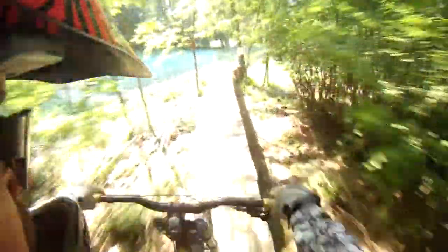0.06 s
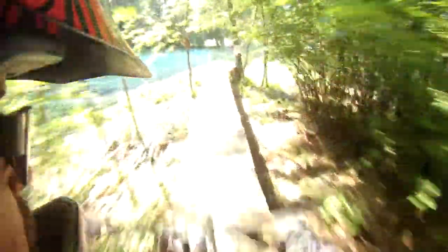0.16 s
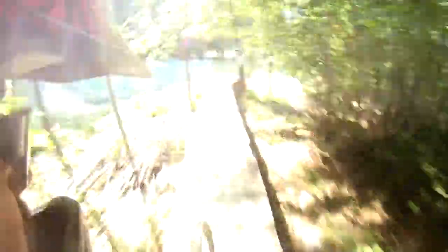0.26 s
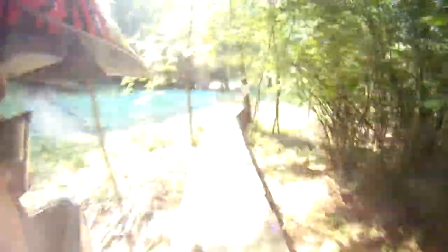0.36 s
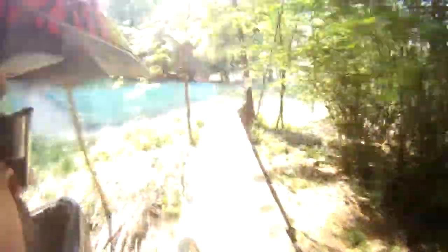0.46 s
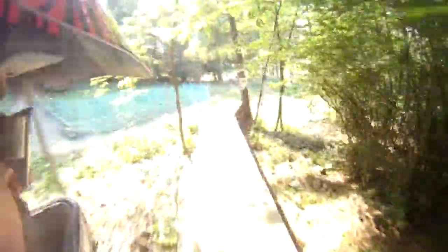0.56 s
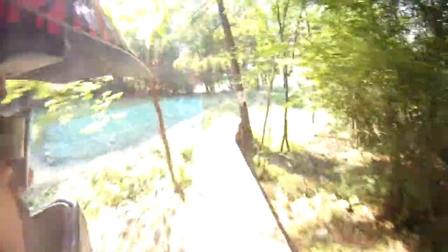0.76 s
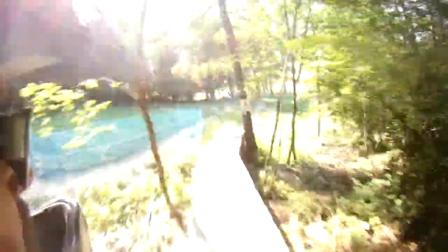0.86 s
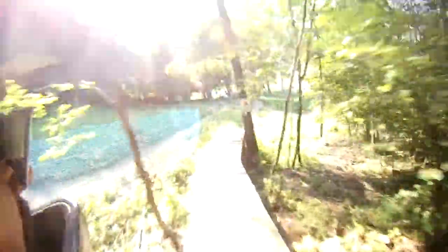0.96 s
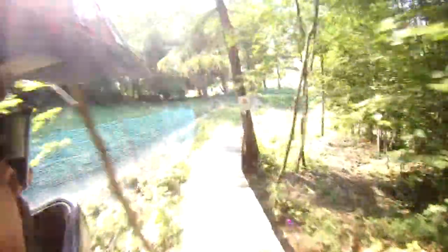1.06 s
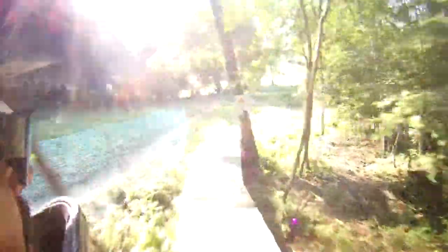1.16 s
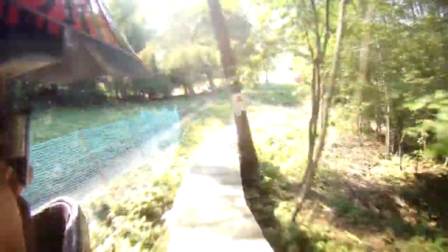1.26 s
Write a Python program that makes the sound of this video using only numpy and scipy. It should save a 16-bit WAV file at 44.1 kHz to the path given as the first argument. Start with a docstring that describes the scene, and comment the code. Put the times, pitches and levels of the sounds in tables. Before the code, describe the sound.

A bike lands on an outdoor walkway with a deep thump and a sharp metallic rattle, heard from the rider's helmet. A brief squeaky tyre scuff follows, then quieter rolling, light chain jingles and low wind rumble.

```python
"""Mountain bike drop onto a walkway

A narrow walkway, heard at riding height from the microphone of a camera on the rider's helmet.
Both wheels thump down, chain and frame clatter, a tyre scuffs, then the bike rolls on with a few knocks.
Wind rumbles on the microphone; the camera case rings near 2 and 5 kHz, colouring clatter and tread."""
import sys
import numpy as np
from scipy import signal
from scipy.fft import rfft, irfft
from scipy.io import wavfile

SR = 44100
rng = np.random.default_rng(int(sys.argv[2]) if len(sys.argv) > 2 else 0)


def dump_mix(stems):
    """Bounce the given channels to the path in sys.argv[1] as a 16-bit WAV at rate SR."""
    frames = np.atleast_2d(stems).T  # one column per channel
    limited = np.clip(frames, -1, 1)  # hard clip at full scale
    pcm = np.round(limited * 32767).astype(np.int16)
    wavfile.write(sys.argv[1], SR, pcm)


N = 57330
TIME = np.arange(N) / SR
FREQS = np.maximum(np.arange(N // 2 + 1) * SR / N, 1)


def from_db(db):
    """Decibels to gain."""
    return 10 ** (np.asarray(db) / 20)


def rms_one(x):
    """Scale to unit rms."""
    return x / np.sqrt(np.mean(x ** 2) + 1e-20)


def level(curve):
    """Gain along a (time [s], level [dB]) curve, holding its end values outside it."""
    times, db = np.transpose(curve)
    return from_db(np.interp(TIME, times, db))


def swell(peak_s, half_s):
    """A bell-shaped rise and fall."""
    return np.exp(-((TIME - peak_s) / half_s) ** 2)


def dying(start_s, t60_s, attack_s):
    """A quick rise, then exponential decay."""
    age = np.maximum(TIME - start_s, 0)
    return (1 - np.exp(-age / attack_s)) * from_db(-60 * age / t60_s)


def colour_db(colour):
    """A (frequency [Hz], gain [dB]) curve at every frequency, falling away below its first point."""
    hz, db = np.transpose(colour)
    low_cut_db = 40 * np.log10(np.clip(FREQS / hz[0], .03, 1))
    return np.interp(np.log(FREQS), np.log(hz), db) + low_cut_db


def shaped(x, db):
    """Minimum-phase filter with the given response, so that nothing sounds early."""
    cepstrum = irfft(np.log(from_db(db)), N)
    cepstrum[1:N // 2] *= 2
    cepstrum[N // 2 + 1:] = 0
    return irfft(rfft(x) * np.exp(rfft(cepstrum)), N)


def noise(colour):
    """Unit-rms noise with the given spectrum."""
    return rms_one(shaped(rng.standard_normal(N), colour_db(colour)))


def drift(rate_hz):
    """Unit-rms random wander, mostly slower than rate_hz."""
    hz = np.arange(N // 2 + 1) * SR / N
    return rms_one(irfft(rfft(rng.standard_normal(N)) / (1 + (hz / rate_hz) ** 2), N))


def ring(clicks, hz, t60_s):
    """A resonator: each click starts a decaying sine."""
    radius, angle = from_db(-60 / (t60_s * SR)), 2 * np.pi * hz / SR
    return signal.lfilter([0, np.sin(angle)], [1, -2 * radius * np.cos(angle), radius ** 2], clicks + 1e-18)


def wind():
    """Air rumbles right on the microphone, surging as the drop shakes it."""
    # rumble spectrum: (frequency [Hz], relative gain [dB])
    colour = [(15, -10), (35, 4.5), (60, 2.5), (100, -7.5), (200, -10), (320, -19), (500, -24.5),
              (900, -34.5), (2000, -61)]
    # wind strength: (time [s], level [dB])
    strength = [(0, -43.5), (0.2, -44), (0.45, -42), (0.58, -43), (0.72, -42), (0.8, -43), (0.93, -43),
                (1.05, -41.5), (1.18, -45), (1.3, -42.5)]
    jolt = from_db(-29) * swell(peak_s=0.2815, half_s=0.056)
    return noise(colour) * from_db(0.5 * drift(rate_hz=16)) * (level(strength) + jolt)


def rolling():
    """Grainy rush of the tread on the walkway below, with light jingles of the chain."""
    # tread spectrum: (frequency [Hz], relative gain [dB])
    tread_colour = [(300, -3.5), (600, -8.5), (800, -10.5), (980, -5.5), (1250, -11), (1700, -2), (2200, 2),
                    (2800, -10.5), (4200, -17.5), (5100, -7.5), (5800, -19.5), (6800, -27.5), (10000, -35),
                    (15000, -49)]
    # tread rush: (time [s], level [dB])
    rush = [(0, -58), (0.1, -53), (0.18, -57), (0.4, -49), (0.55, -52), (0.73, -54), (0.88, -50),
            (0.965, -53), (1.1, -53.5), (1.25, -54), (1.3, -53)]
    # chain spectrum: (frequency [Hz], relative gain [dB])
    chain_colour = [(1300, -20), (1800, -6), (2200, 2), (2600, -14), (3500, -16.5), (9000, -42)]
    # chain jingles: (time [s], level relative to jingle_db [dB])
    jingles = [(0.925, 0.5), (0.999, -0.5), (1.141, -3.5), (1.206, -2)]
    jingle_db, grain_db = -46, 1.55
    tread = noise(tread_colour) * level(rush)
    chain = noise(chain_colour) * sum(from_db(jingle_db + db) * swell(s, half_s=0.015) for s, db in jingles)
    return (tread + chain) * from_db(grain_db * drift(rate_hz=90))


def scuff():
    """A tyre rubs sideways on the walkway, squeaks unsteadily and throws a little grit."""
    # rubbing spectrum: (frequency [Hz], relative gain [dB])
    rub_colour = [(500, -32), (1150, -14), (1600, 1), (2300, 3.5), (3000, -4), (3900, -3.5), (4800, -5),
                  (6200, -8.5), (7200, -21), (9300, -27), (10500, -31), (15000, -40)]
    # rubbing strength: (time [s], level [dB])
    rub = [(0.36, -62), (0.398, -42.5), (0.425, -45), (0.465, -41.5), (0.49, -51.5), (0.52, -49.5),
           (0.57, -83)]
    # rubber squeaks: (peak time [s], half length [s], pitch [Hz], level [dB])
    squeaks = [(0.47, 0.015, 1785, -34), (0.455, 0.027, 2230, -39), (0.462, 0.04, 1640, -41),
               (0.48, 0.025, 4600, -47)]
    # spectrum of thrown grit: (frequency [Hz], relative gain [dB])
    swish_colour = [(2500, -19), (4500, 1.5), (6500, 3), (8500, -13), (15000, -32)]
    # swishes of grit: (peak time [s], half length [s], level [dB])
    swishes = [(0.401, 0.004, -55), (0.556, 0.0094, -53), (0.643, 0.0061, -58)]
    sag_per_s, waver_hz, flutter_db = 0.4, 14, 2.3
    out = noise(rub_colour) * level(rub)
    for s, half_s, hz, db in squeaks:
        pitch_hz = hz * (1 - sag_per_s * (TIME - s)) + waver_hz * drift(rate_hz=153)
        envelope = from_db(db + flutter_db * drift(rate_hz=100)) * swell(s, half_s)
        out += envelope * np.sin(2 * np.pi * np.cumsum(pitch_hz) / SR)
    grit = noise(swish_colour) * sum(from_db(db) * swell(s, half_s) for s, half_s, db in swishes)
    return out + grit


def bumps():
    """Bumps under the tyres give short hollow knocks with a gritty edge."""
    # dull knocks: (time [s], level [dB], pitch [Hz], grit relative to the tone [dB])
    knocks = [(0.1315, -29.5, 240, -5.5), (0.263, -25.5, 200, -7.5), (0.274, -29.5, 240, -7.5),
              (0.311, -28.5, 244, -6.5), (1.2307, -26, 218, -16.5)]
    # grit spectrum: (frequency [Hz], relative gain [dB])
    grit_colour = [(120, 0.5), (400, 0), (700, -13.5), (1200, -19), (2500, -34), (8000, -56)]
    out, grit = np.zeros(N), noise(grit_colour)
    for s, db, hz, grit_db in knocks:
        tone = np.sin(2 * np.pi * hz * (TIME - s))
        out += from_db(db) * dying(s, t60_s=0.046, attack_s=0.00075) * (from_db(grit_db) * grit - tone)
    return out


def chain_rattle():
    """The landing shakes the chain: dense small contacts each tick and ring briefly at their own pitch."""
    # rattle spectrum at the microphone: (frequency [Hz], relative gain [dB])
    colour = [(400, -15), (900, -22.5), (1200, -6.5), (1650, 2.5), (2300, 1.5), (3000, -4.5), (4100, -8.5),
              (5100, -1), (5800, -6), (6700, -17), (8400, -16), (10000, -27.5), (12000, -33), (15000, -40)]
    # shaking of the loose links: (time [s], level [dB])
    shaking = [(0.198, -84), (0.204, -46), (0.23, -43), (0.262, -38), (0.292, -40.5), (0.312, -30),
               (0.33, -32), (0.345, -39), (0.375, -47), (0.44, -48.5), (0.54, -62)]
    contacts_per_s, spread_db, ring_cycles, tick_db = 4000, 2.5, 56, -9
    hits = rng.random(N) < contacts_per_s / SR
    strengths = from_db(spread_db * np.minimum(rng.exponential(1, N), 4))
    clicks = hits * strengths * rng.choice([-1, 1], N)
    pitches_hz = np.geomspace(1300, 14000, 60)
    pitch_index = rng.integers(len(pitches_hz), size=N)
    rings = sum(hz * ring(clicks * (pitch_index == k), hz, t60_s=ring_cycles / hz)
                for k, hz in enumerate(pitches_hz))
    links = rms_one(rings) + from_db(tick_db) * rms_one(clicks)
    return rms_one(shaped(links, colour_db(colour))) * level(shaking)


def clacks():
    """Chain and frame strike: a click and a moment of chatter, and the struck part rings briefly."""
    # contact spectrum at the microphone: (frequency [Hz], relative gain [dB])
    colour = [(300, -13.5), (500, -15), (720, -20), (960, -9), (1250, -15), (1650, 1), (2050, 2),
              (2500, -0.5), (3000, -5.5), (4100, -15), (5000, -6.5), (5700, -13), (6700, -19.5),
              (8000, -27.5), (11000, -28.5), (15000, -40)]
    # hard contacts: (time [s], level relative to clack_db [dB], treble [dB], bass [dB],
    # chatter decay [s], ring pitch [Hz], ring level [dB])
    strikes = [(0.0505, -47.5, 11, -12, 0.0008, 5100, -50.5), (0.09, -43, -14, -10, 0.0022, 1810, -39.5),
               (0.1322, -32.5, -16, 7, 0.0015, 1890, -38), (0.1355, -36, -26, 9, 0.0024, 960, -40),
               (0.2005, -27, -6, -3, 0.00097, 2160, -31.5), (0.214, -31, -8, -18, 0.0028, 2210, -25),
               (0.2345, -23.5, -11, -9, 0.0035, 5170, -38), (0.249, -28, 0, -4, 0.003, 5110, -33),
               (0.2695, -35, 18.5, -8, 0.0012, 5280, -28.5), (0.2745, -17, -9, 5.5, 0.003, 2002, -24),
               (0.3051, -15, -7, -9, 0.0024, 2447, -15.5), (0.3077, -17, -1, -8, 0.0026, 2760, -19.5),
               (0.3122, -21, 5, 1, 0.0021, 2084, -20.5), (0.3199, -26, 6.5, -3, 0.0035, 7910, -32),
               (0.3274, -24.5, 8, -33, 0.0064, 4940, -22), (0.8153, -26, -1.5, 6, 0.00085, 2470, -40),
               (0.8175, -31.5, -14, 0, 0.00081, 1860, -38), (0.8915, -39, -2, 0, 0.00089, 5230, -55)]
    clack_db, chatter_db = 13, -7
    treble_hz, bass_hz, shelf_slope = 4250, 1300, 7.5
    treble_shelf = 1 / (1 + (treble_hz / FREQS) ** shelf_slope)
    bass_shelf = 1 / (1 + (FREQS / bass_hz) ** shelf_slope)
    out, body_db = np.zeros(N), colour_db(colour)
    for s, db, treble_db, bass_db, chatter_s, ring_hz, ring_db in strikes:
        contact = from_db(chatter_db) * rng.standard_normal(N) * np.exp(-np.minimum(TIME / chatter_s, 20))
        contact[0] = 1  # the opening click
        contact = shaped(contact, body_db)
        contact /= np.sqrt(np.sum(contact ** 2))
        contact = shaped(contact, treble_db * treble_shelf + bass_db * bass_shelf)
        start = int(s * SR)
        out[start:] += from_db(clack_db + db) * contact[:N - start]
        tone = np.sin(2 * np.pi * ring_hz * (TIME - s))
        out += from_db(ring_db) * dying(s, t60_s=0.023, attack_s=0.0004) * tone
    return out


def landings():
    """Each wheel gives a deep thump whose pitch sags as the tyre springs back."""
    # a wheel loads or lands: (time [s], level [dB], final pitch [Hz], extra pitch at onset [Hz], t60 [s])
    thumps = [(0.2419, -16.5, 32.7, 12, 0.09), (0.2758, -8.5, 55.2, 97, 0.15),
              (0.3114, -10.5, 56.2, 92, 0.2)]
    bend_s = 0.0039
    out = np.zeros(N)
    for s, db, hz, bend_hz, t60_s in thumps:
        age = np.maximum(TIME - s, 0)
        cycles = hz * age + bend_hz * bend_s * (1 - np.exp(-age / bend_s))
        out += from_db(db) * dying(s, t60_s, attack_s=0.0022) * np.sin(2 * np.pi * cycles)
    return out


def scene():
    """Bike and wind at the helmet, in mono."""
    return (landings() + bumps() + clacks() + chain_rattle() + scuff() + rolling() + wind())[None]


def record(dry):
    """The helmet microphone: faint hiss and a steep cut of the highest treble."""
    hiss_db, cutoff_hz = -70, 15900
    hiss = from_db(hiss_db) * rng.standard_normal(N)
    low_pass = signal.ellip(12, .1, 80, cutoff_hz, fs=SR, output="sos")
    return signal.sosfilt(low_pass, dry + hiss)


dry = scene()
out = record(dry)
dump_mix(out)
```